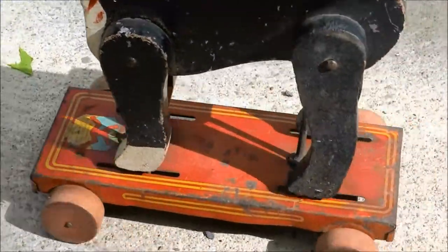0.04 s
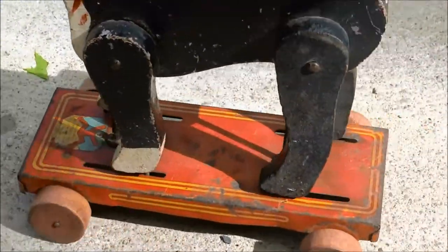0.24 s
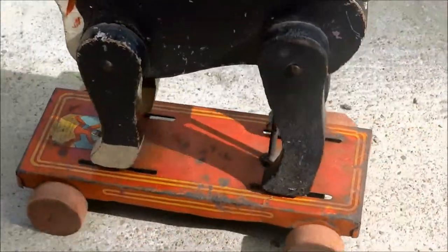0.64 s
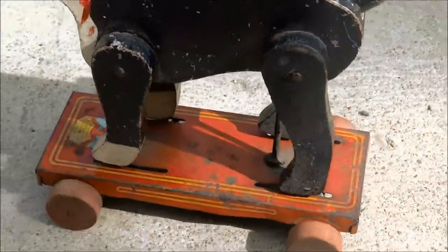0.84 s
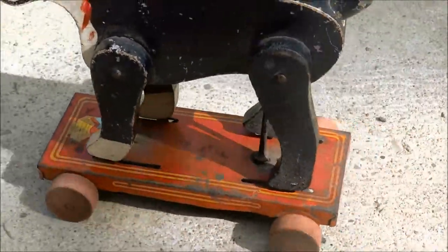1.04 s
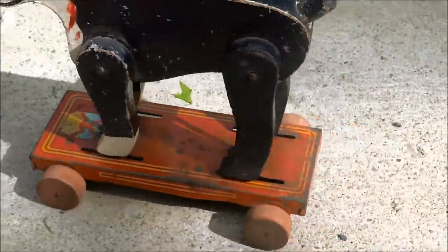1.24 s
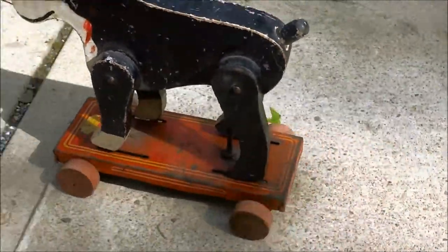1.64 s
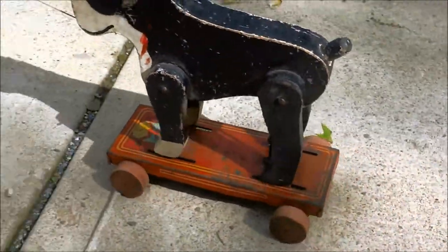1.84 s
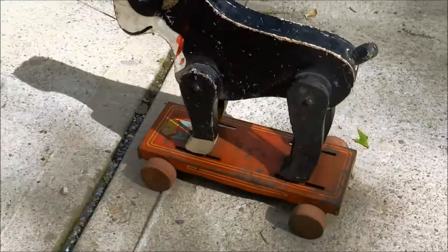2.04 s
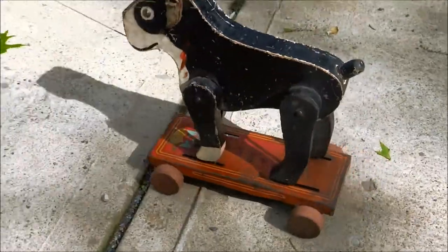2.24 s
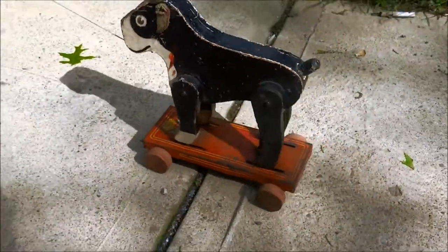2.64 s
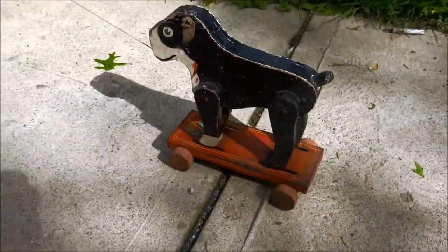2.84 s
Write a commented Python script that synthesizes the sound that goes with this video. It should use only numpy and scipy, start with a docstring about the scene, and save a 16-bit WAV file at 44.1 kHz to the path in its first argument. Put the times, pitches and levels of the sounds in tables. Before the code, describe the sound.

A wheeled wooden toy rattles over concrete close by, softly at first, while a small bird whistles a quick high phrase until about 1.1 seconds. From 1 second the tin platform clatters with hollow knocks and wire ticks, peaking near 1.5. It eases, then builds again with wooden clacks from 1.9, loudest around 2.5 and dying away by 2.9. Quiet outdoor noise and a faint low hum continue throughout.

```python
"""Wooden pull dog on concrete

Outdoors, close to the microphone, an old wooden dog is pulled along on a wheeled tin platform.
Grit rattles the wheels, bumps set the platform ringing, wire leg links tick in their slots and,
later on, the wooden legs clack. A small bird whistles one high phrase at the start, echoing
around the yard. Behind it all lie quiet, distant noise and a low hum."""
import sys
import numpy as np
from scipy import signal
from scipy.fft import rfft, irfft
from scipy.io import wavfile
from scipy.ndimage import uniform_filter1d

SR = 44100
rng = np.random.default_rng(int(sys.argv[2]) if len(sys.argv) > 2 else 0)


def unload_wav(signal):
    """Save mono or channel-first audio to the path in sys.argv[1] as 16-bit WAV at rate SR, clipped to [-1, 1]."""
    wavfile.write(
        sys.argv[1],
        SR,
        np.round(np.clip(np.atleast_2d(signal).T, -1, 1) * 32767).astype(np.int16),
    )


N = 127890

# The open air. Each row: frequency in Hz, relative level in dB.
AIR_SPECTRUM = [(20, -21), (50, -18.5), (80, -16), (115, -2), (190, -5), (280, -2), (400, -6), (1100, -3.5),
                (2500, -10.5), (5000, -16.5), (10000, -22.5), (13000, -22.5), (16000, -47)]
# How alike the air is left and right. Each row: frequency in Hz, correlation from 0 to 1.
AIR_CORRELATION = [(25, .85), (70, 1), (300, 0.98), (700, 0.77), (10000, 1)]
# How hard the wheels rattle. Each row: time in seconds, relative level in dB.
ROLL_LEVELS = [(0, -41), (.1, -50.5), (.37, -53.5), (.47, -43), (.7, -49), (.9, -48), (1.0, -39.5),
               (1.36, -36), (1.45, -33), (1.59, -42.5), (1.73, -50.5), (1.87, -48), (1.98, -48.5),
               (2.14, -42), (2.41, -39.5), (2.58, -31), (2.63, -46), (2.82, -46.5), (2.9, -57)]
# Modes of the hollow platform, its tin, a wire link and the wooden legs.
# Each row: frequency in Hz, relative level in dB, seconds to fall by 60 dB.
HOLLOW_MODES = [(1516, -2, 0.047), (1609, 4.5, 0.036), (1732, -3, 0.055), (2047, -15.5, 0.087)]
CLATTER_MODES = [(2824, -23, 0.099), (3490, -2.5, 0.013), (4200, -10, .03), (5362, 3.5, 0.032),
                 (5780, -7.5, 0.032), (6780, -9, 0.037), (7200, 1, 0.014), (8010, -4.5, 0.021),
                 (8420, -1, 0.041), (9300, -2, 0.026)]
WIRE_MODES = [(1720, -6, 0.0066), (3590, -3.5, 0.029), (3900, -15, 0.017), (5170, -2, 0.029),
              (5670, 4.5, 0.031), (7970, 1.5, 0.018), (8550, 3.5, 0.017), (10300, -4, 0.014),
              (11850, -5, 0.019)]
LEG_MODES = [(532, -10, 0.094), (927, -2.5, 0.042), (1130, 0.5, 0.1), (2237, 7, 0.064)]
# Dense ringing between the modes, hollow and bright. Each row: frequency in Hz, relative level in dB.
HOLLOW_SPECTRUM = [(100, -67), (400, -24), (800, -25), (1280, -12), (1600, 2.5), (2100, -5.5), (2600, -9.5),
                   (3500, -11), (8000, -31)]
CLATTER_SPECTRUM = [(600, -40), (2000, -2), (3000, -8), (3700, 1.5), (4800, -2), (5400, -1), (6300, -1),
                    (8500, -3), (11000, -1.5), (13000, -15), (15500, -13.5)]
# Ticks of the leg links. Each row: start in seconds, relative level in dB.
LINK_TICKS = [(0.007, -30.5), (0.421, -33), (0.539, -30.5), (0.561, -29.5), (0.58, -32.5), (0.622, -33),
              (1.158, -20.5), (1.205, -27), (1.2238, -25.5), (1.3, -21.5), (1.3429, -20.5), (1.571, -33),
              (1.593, -26.5), (1.6117, -34), (1.7672, -24), (1.8393, -22.5), (1.924, -34), (2.028, -39),
              (2.063, -30.5), (2.118, -18.5), (2.206, -27), (2.255, -17.5), (2.276, -24), (2.362, -25.5),
              (2.381, -32.5), (2.634, -20), (2.687, -26), (2.732, -31)]
# Bumps under the platform. Each row: start in seconds, relative hollow and clatter levels in dB.
BUMPS = [(0.033, -54, -36), (0.47, -33, -55), (0.515, -33.5, -49), (0.787, -38, -40), (0.955, -28.5, -34),
         (1.049, -32.5, -37), (1.067, -20, -26.5), (1.088, -25.5, -26), (1.114, -26.5, -37),
         (1.147, -33, -40), (1.179, -20, -21.5), (1.23, -24.5, -22.5), (1.289, -24, -28),
         (1.321, -25, -23.5), (1.344, -23, -29), (1.382, -45, -27), (1.388, -20.5, -25),
         (1.4131, -20.5, -9.5), (1.422, -19, -20), (1.436, -19.5, -13), (1.443, -20.5, -18.5),
         (1.454, -17, -14.5), (1.465, -24.5, -19.5), (1.41, -23, -21), (1.488, -18, -16.5),
         (1.503, -36, -27), (1.511, -27.5, -25), (1.522, -23.5, -18.5), (1.544, -26, -21.5),
         (1.5466, -34, -25.5), (1.613, -31, -33), (1.775, -30, -40), (1.807, -34.5, -33), (1.85, -26, -24),
         (1.859, -28, -24), (1.873, -25.5, -26), (1.903, -31, -29.5), (2.002, -31, -41),
         (2.013, -30.5, -33.5), (2.104, -23, -31), (2.121, -25, -16), (2.129, -25.5, -46), (2.19, -28, -29),
         (2.243, -21.5, -25), (2.258, -19, -16.5), (2.263, -22.5, -17), (2.31, -29, -31), (2.339, -28, -27),
         (2.3447, -29, -19.5), (2.419, -26, -32), (2.434, -15.5, -10.5), (2.4473, -12, -10),
         (2.457, -21, -14.5), (2.486, -22.5, -20.5), (2.512, -25, -37), (2.526, -19, -20),
         (2.535, -22, -23), (2.55, -19.5, -29), (2.558, -24, -15.5), (2.572, -28, -23), (2.6, -19, -16.5),
         (2.609, -31, -21.5), (2.696, -35.5, -37)]
# The bird's dipping calls. Each row: start in seconds, time stretch, pitch factor, relative level in dB.
DIP_CALLS = [(-.178, 1.0, .99, -41), (.142, 1.02, 0.99, -33), (.331, 0.99, 1.005, -27.5)]
# One call: high hold, quick dip, level note. Each row: time in seconds, pitch in Hz, relative level in dB.
DIP_CONTOUR = [(0, 8700, -17), (0.013, 8860, -13.5), (.018, 7850, -2), (0.025, 6170, -6.5),
               (0.034, 4640, -10), (.043, 5600, -10.5), (.056, 6790, -2), (0.068, 6920, 2),
               (0.087, 6460, -1), (.106, 6350, -11)]
# Falling whistles. Each row: start and length in seconds, top pitch in Hz, relative level in dB.
FALLING_CALLS = [(0.502, 0.061, 7550, -32.5), (0.609, 0.059, 7700, -30.5), (.714, 0.061, 7670, -29.5),
                 (0.824, 0.063, 7500, -28)]
# One falling whistle. Each row: share of its length, share of its top pitch, relative level in dB.
FALL_CONTOUR = [(0, 1, -12), (0.222, 0.91, 6.5), (.42, 0.84, 7), (.53, 0.86, -22.5), (0.66, .765, 5),
                (0.849, 0.69, 3), (1, 0.53, 2.5)]
# The closing upward whistle. Each row: time in seconds, pitch in Hz, relative level in dB.
RISE_CONTOUR = [(.926, 3640, -40), (.945, 4260, -22), (.966, 4476, -23.5), (.974, 4550, -42),
                (.992, 4790, -22), (1.022, 5300, -29), (1.048, 6150, -28), (1.068, 7500, -31.5)]
# Clacks of the wooden legs. Each row: start in seconds, relative level in dB.
LEG_CLACKS = [(1.873, -38), (1.903, -37), (2.122, -33), (2.259, -34.5), (2.344, -31.5), (2.448, -32.5),
              (2.529, -27)]
# The toy's stereo width at the microphone. Each row: frequency in Hz, side against mid in dB.
TOY_WIDTH = [(500, -21), (1600, -29), (5500, -21), (8500, -13.5), (13000, -27)]

HOLLOW_T60_S, CLATTER_T60_S, TAIL_T60_S = 0.053, 0.05, 0.22
HIT_S = .08
HIT_RMS = np.sqrt(.006 / HIT_S)  # a contact carries the energy of 6 ms at unit level
FIRM_DETUNE, LOOSE_DETUNE = 0.0082, 0.0203  # share by which a mode's pitch varies between contacts


def amp(db):
    """Decibels to gain."""
    return 10 ** (np.asarray(db) / 20)


def unit(x):
    """Scales to an rms of one."""
    return x / np.sqrt(np.mean(x ** 2) + 1e-20)


def read(spectrum, hz):
    """Reads a spectrum table on a log-frequency axis."""
    table_hz, value = np.transpose(spectrum)
    return np.interp(np.log(hz + 1), np.log(table_hz), value)


def colour(x, spectrum):
    """Filters by a spectrum table."""
    return irfft(rfft(x) * amp(read(spectrum, np.fft.rfftfreq(len(x), 1 / SR))), len(x))


def add(mix, start_s, sound):
    """Mixes a sound in, dropping whatever falls outside the mix."""
    at = round(start_s * SR)
    sound = sound[max(-at, 0):]
    part = mix[max(at, 0):][:len(sound)]
    part += sound[:len(part)]


def background(air_db=-47, hum_db=-66.5, hum_hz=120.5, hum_width_hz=9):
    """Soft noise far from the microphone, with a low, wavering hum."""
    hz = np.fft.rfftfreq(N, 1 / SR)
    left, apart, hum_noise = rfft(rng.standard_normal((3, N)))
    same = np.clip(read(AIR_CORRELATION, hz), 0, 1)
    right = same * left + np.sqrt(1 - same ** 2) * apart
    air = irfft(np.array([left, right]) * amp(read(AIR_SPECTRUM, hz)), N)
    hum = irfft(hum_noise / (1 + (2 * (hz - hum_hz) / hum_width_hz) ** 2), N)
    return amp(air_db) * unit(air) + amp(hum_db) * unit(hum)


def ring(modes, spectrum, dense_t60, dense_db, detune, spread_db=5, tail_db=-15):
    """One contact: clear modes, struck differently each time, over dense ringing and faint reflections."""
    t = np.arange(round(HIT_S * SR)) / SR
    hz, db, t60 = np.transpose(modes)[:, :, None]
    strength, shift, phase = rng.standard_normal((3, len(modes), 1))
    mode_decay = amp(db + spread_db * strength - 60 * t / t60)
    clear = (mode_decay * np.sin(2 * np.pi * (hz * (1 + detune * shift) * t + phase))).sum(0)
    dense_decay = amp(-60 * t / dense_t60) + amp(tail_db - 60 * t / TAIL_T60_S)
    dense = colour(rng.standard_normal(len(t)), spectrum) * dense_decay
    return HIT_RMS * unit(unit(clear) + amp(dense_db) * unit(dense))


def hollow():
    """The struck platform rings with a hollow note."""
    return ring(HOLLOW_MODES, HOLLOW_SPECTRUM, HOLLOW_T60_S, dense_db=-2.5, detune=FIRM_DETUNE)


def clatter():
    """The platform's tin rings brightly; loose parts take a new pitch on each contact."""
    return ring(CLATTER_MODES, CLATTER_SPECTRUM, CLATTER_T60_S, dense_db=0, detune=LOOSE_DETUNE)


def wheels(grit_per_s=420, spread_db=6, hollow_db=1.5, variants=24):
    """Grit under the wheels jolts the platform at random; harder rolling sounds brighter."""
    roll_db = np.interp(np.arange(N) / SR, *np.transpose(ROLL_LEVELS))
    on_grit = rng.random(N) < grit_per_s / SR
    jolts = on_grit * amp(spread_db * np.minimum(rng.exponential(1, N), 3))
    variant = rng.integers(0, variants, N)
    rings = [(hollow(), clatter()) for _ in range(variants)]
    low, high = np.zeros((2, N))
    for at in np.flatnonzero(jolts):
        low_ring, high_ring = rings[variant[at]]
        add(low, at / SR, jolts[at] * low_ring)
        add(high, at / SR, jolts[at] * high_ring)
    bright_db = 0.26 * (roll_db - roll_db.mean())
    return amp(roll_db) * (amp(hollow_db) * unit(low) + amp(bright_db) * unit(high))


def links(gain_db=-3):
    """The leg wires snap against their slots with a clear ping."""
    out = np.zeros(N)
    for start_s, db in LINK_TICKS:
        ping = ring(WIRE_MODES, CLATTER_SPECTRUM, CLATTER_T60_S, dense_db=-3, detune=FIRM_DETUNE)
        add(out, start_s, amp(db + gain_db) * ping)
    return out


def knock(part, attack_s=0.00037, bounce_db=-6):
    """A loose contact: it builds up over a moment and bounces once."""
    hit = part()
    bounce_s = rng.uniform(.001, .004)
    add(hit, bounce_s, amp(bounce_db) * part())
    attack = 1 - np.exp(-np.arange(len(hit)) / SR / attack_s)
    return HIT_RMS * unit(hit * attack)


def bumps(hollow_gain_db=-2.5, clatter_gain_db=-3):
    """Each bump in the concrete knocks the platform, sounding its hollow note and its tin."""
    out = np.zeros(N)
    for start_s, hollow_db, clatter_db in BUMPS:
        add(out, start_s, amp(hollow_db + hollow_gain_db) * knock(hollow))
        add(out, start_s, amp(clatter_db + clatter_gain_db) * knock(clatter))
    return out


def echo(x, t60, delay_s, width):
    """Scattered reflections reach the microphone off the ground and nearby walls, in stereo."""
    t = np.arange(SR // 2) / SR
    taps = rng.standard_normal((2, len(t))) * (rng.random((2, len(t))) < .1)
    taps *= amp(-60 * t / t60) * (t > delay_s)
    taps /= np.linalg.norm(taps, axis=1, keepdims=True)
    mid, side = signal.fftconvolve(x[None], taps, axes=1)[:, :N]
    return np.array([mid + width * side, mid - width * side])


def whistle(times, hz, db, waver=0.007, fade_s=0.00089):
    """A pure, slightly unsteady tone along a pitch and level contour."""
    t = np.arange(0, times[-1], 1 / SR)
    drift = unit(uniform_filter1d(rng.standard_normal(SR // 2), 90))[:len(t)]
    turns = np.cumsum(np.interp(t, times, hz) * (1 + waver * drift)) / SR
    fade = np.clip(np.minimum(t, t[-1] - t) / fade_s, 0, 1)
    return np.sqrt(2) * fade * amp(np.interp(t, times, db)) * np.sin(2 * np.pi * turns)


def bird(left_db=0.95, gain_db=-1, echo_db=-2.5):
    """Out in the yard, just left of centre: dipping calls, four falling whistles and a closing rise."""
    song = np.zeros(N)
    t, hz, db = np.transpose(DIP_CONTOUR)
    for start_s, stretch, pitch, call_db in DIP_CALLS:
        add(song, start_s, whistle(t * stretch, hz * pitch, db + call_db))
    share, fall, db = np.transpose(FALL_CONTOUR)
    for start_s, length_s, top_hz, call_db in FALLING_CALLS:
        add(song, start_s, whistle(share * length_s, fall * top_hz, db + call_db))
    t, hz, db = np.transpose(RISE_CONTOUR)
    add(song, t[0], whistle(t - t[0], hz, db))
    heard = song + amp(echo_db) * echo(song, t60=0.29, delay_s=0.003, width=0.2)
    return heard * amp(gain_db + np.array([[left_db], [-left_db]]))


def legs():
    """The wooden legs clack against the hollow dog with a dry note."""
    out = np.zeros(N)
    for start_s, db in LEG_CLACKS:
        clack = ring(LEG_MODES, HOLLOW_SPECTRUM, HOLLOW_T60_S, dense_db=-8, detune=2 * LOOSE_DETUNE)
        add(out, start_s, amp(db) * clack)
    return out


def toy(lowest_hz=400, yard_db=-21):
    """The whole toy, close and nearly central, faintly echoed by the yard; too small to give off bass."""
    low_cut = signal.butter(2, lowest_hz, "high", fs=SR, output="sos")
    near = signal.sosfilt(low_cut, bumps() + legs() + links() + wheels())
    side = colour(signal.hilbert(near).imag, TOY_WIDTH)  # a quarter-cycle shift widens without panning
    yard = echo(near, TAIL_T60_S, delay_s=0.0061, width=0.35)
    return np.array([near + side, near - side]) + amp(yard_db) * yard


def scene():
    """The toy by the microphone, with the bird and the open air beyond."""
    return toy() + bird() + background()


def record(dry, edge_hz=15950):
    """The recorder's band limit takes off the highest treble."""
    low_pass = signal.firwin(511, edge_hz, window=("kaiser", 9), fs=SR)
    return signal.oaconvolve(dry, low_pass[None], "same", axes=1)


dry = scene()
out = record(dry)
unload_wav(out)
```